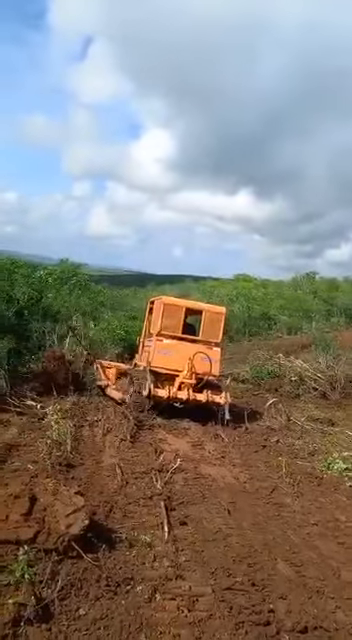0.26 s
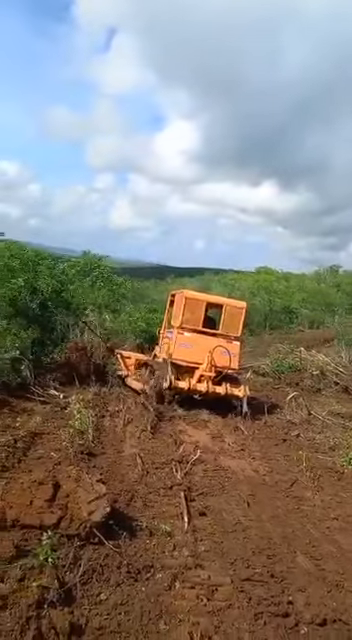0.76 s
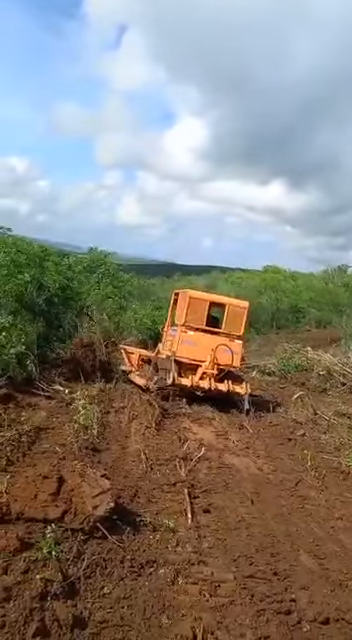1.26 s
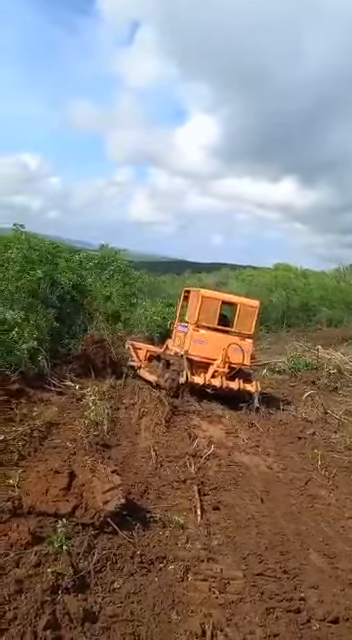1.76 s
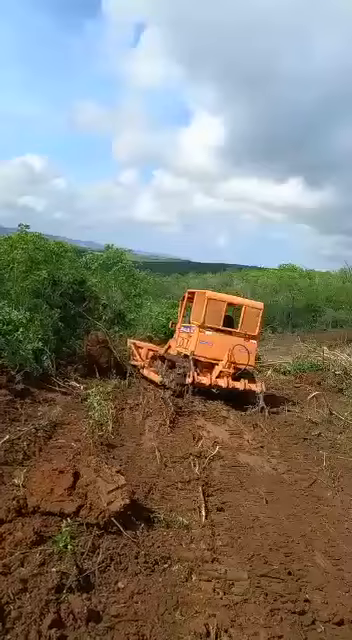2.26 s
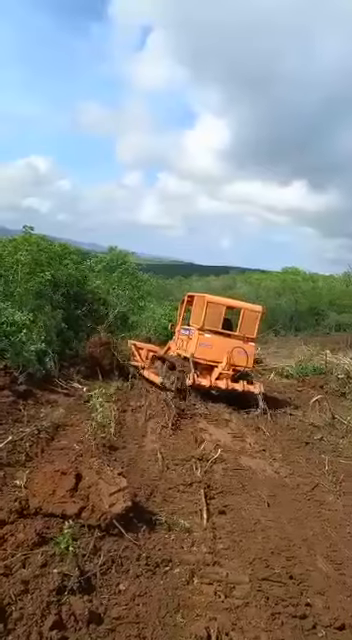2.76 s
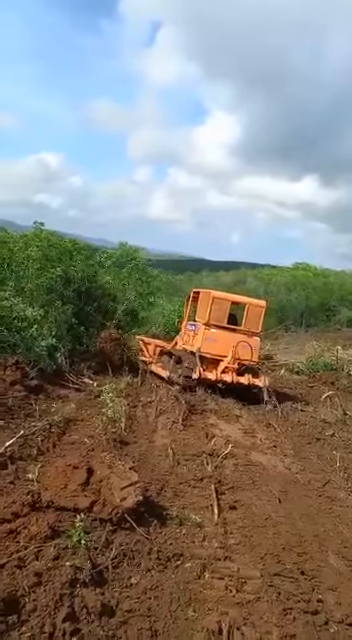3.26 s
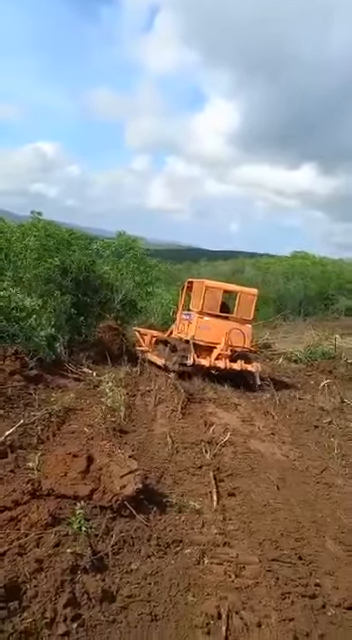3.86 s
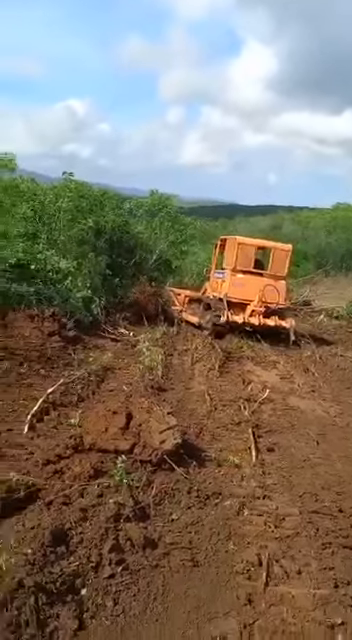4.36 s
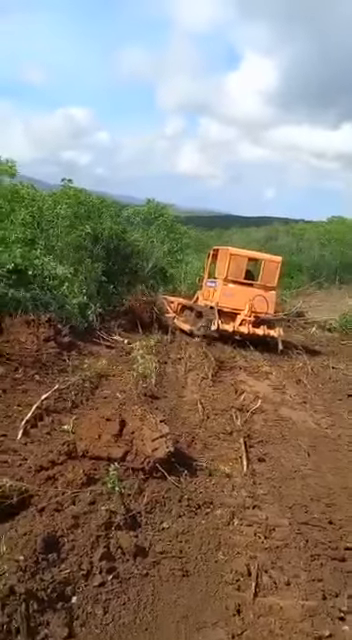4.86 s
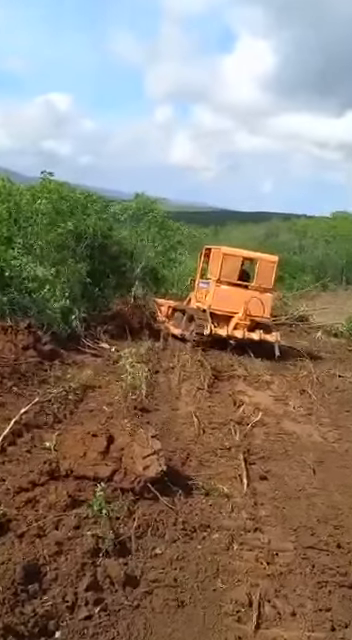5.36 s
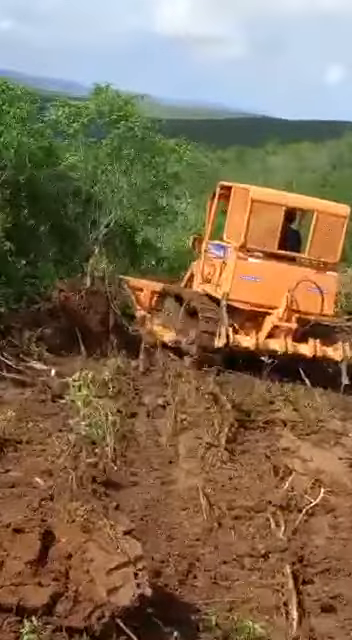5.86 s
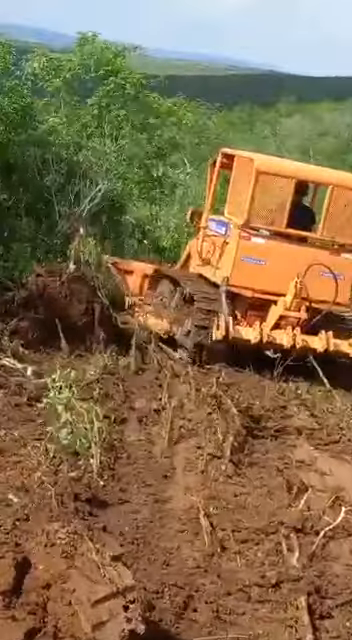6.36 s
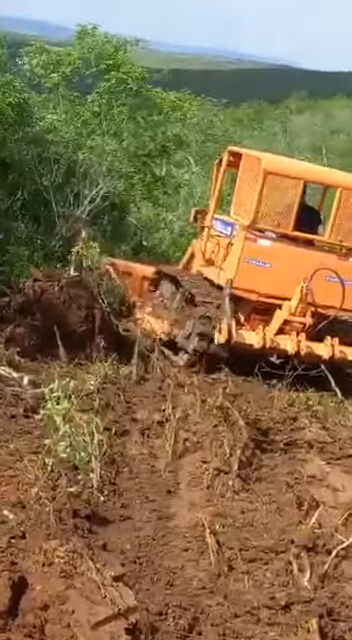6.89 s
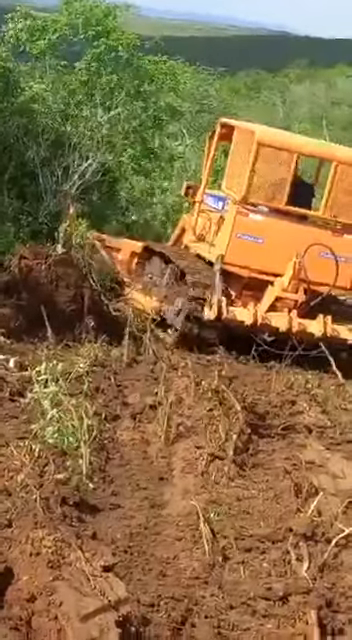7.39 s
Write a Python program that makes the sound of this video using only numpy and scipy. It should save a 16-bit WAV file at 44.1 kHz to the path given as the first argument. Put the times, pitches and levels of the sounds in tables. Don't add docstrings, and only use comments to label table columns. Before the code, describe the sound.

A steady heavy diesel drone fills an open field, broad low roar beneath and raspy metallic clatter above. It labours for about a second, its pitch sagging slightly, then runs freer and duller as the exhaust is shielded. Small steel clinks and roller knocks come irregularly, dry wood cracks now and then, the loudest past the middle together with a low wind thump. Outdoor stereo pickup at a distance, little echo.

```python
import sys
import numpy as np
from scipy import signal
from scipy.fft import rfft, irfft
from scipy.io import wavfile
from scipy.ndimage import uniform_filter1d

SR = 44100
rng = np.random.default_rng(int(sys.argv[2]) if len(sys.argv) > 2 else 0)


def field_ratio(decibels):
    return 10 ** (np.asarray(decibels, dtype=float) / 20)


def log_audio(samples):
    frames = np.atleast_2d(samples).T
    limited = np.clip(frames, -1, 1)
    pcm = np.round(limited * 32767).astype(np.int16)
    wavfile.write(sys.argv[1], SR, pcm)


N = 336483
T = np.arange(N) / SR
SLOW_STEP = 256
SLOW_T = np.arange(N // SLOW_STEP + 2) * SLOW_STEP / SR
CYLINDERS, FREE_HZ = 6, 82.3

# start_s, strain_0_to_1, turned_away_and_eased_0_to_1
WORK = [
    (0, 0, 0),
    (1.6, 0, 0),
    (1.78, 1, 0),
    (2.6, 1, 0),
    (2.9, .2, .3),
    (3.3, 0, .75),
    (4, 0, 1),
    (7.63, 0, 1),
]
# pitch_hz, facing_db_per_hz, turned_away_db_per_hz
METAL_COLOUR = [(1631, -68.5, -68), (1710, -75.5, -73), (2562, -68, -66.5), (2780, -63.5, -67.5),
                (3278, -80.5, -77), (3460, -73.5, -74), (4170, -76.5, -75), (4530, -73, -77),
                (6580, -81.5, -80), (6710, -76, -77.5), (7890, -78.5, -81), (8930, -76, -84),
                (10080, -77, -81), (11020, -69.5, -79.5), (12000, -71.5, -78.5)]
# pitch_hz, facing_rad, turned_away_rad
PORT_LEAD = [(493, 0, 0), (915, -.7, 0.19), (1126, -0.2, 0.58), (1408, -.8, 0.3), (1563, -.6, -1.5),
             (2000, -.4, 1), (2410, -1, -1.2), (2700, -0.12, -0.17), (3520, 0.3, 0.9), (4400, -.5, -1.5),
             (5200, 0.49, 1.5), (5900, -0.54, 1.3), (6800, -0.63, 2), (7400, 1.2, 2), (8370, 0.92, 3.5),
             (9900, -.3, 0.5), (11300, 0.17, 2)]
# hiss_in_view_db, hiss_hidden_db, knock_db
CYLINDER_DB = [(-0.5, -3, -4), (2, 0.5, 3), (-3, -2, 2), (-3, 1.5, -1), (0, 3, 0), (4.5, 0.5, 1.5)]


def evened(x):
    return x / np.sqrt(np.mean(x ** 2) + 1e-20)


def curve(rows, t):
    s, *columns = np.transpose(rows)
    return [np.interp(t, s, c) for c in columns]


def read(points, hz):
    f, *columns = np.transpose(points)
    return [np.interp(np.log(hz + 1), np.log(f + 1), c)[:, None] for c in columns]


def drift(count, hz):
    raw = rng.standard_normal((count, len(SLOW_T)))
    return evened(signal.sosfiltfilt(signal.butter(2, hz, fs=SR / SLOW_STEP, output="sos"), raw))


def sway(hz):
    return np.interp(T, SLOW_T, drift(count=1, hz=hz)[0])


def engine():
    # start_s, firing_rate_hz
    speed = [(0.0, 78.4), (0.25, 78.55), (0.6, 79.6), (0.8, 79.2), (1.32, 80.3), (1.62, 79.7), (2.0, 78.35),
             (2.45, 78.65), (2.88, 80.65), (3.3, 81.7), (3.8, 82.25), (4.55, 82.3), (5.4, 81.95),
             (6.03, 81.05), (6.7, 82.3), (7.05, 81.05), (7.35, 81.9), (7.63, 81.95)]
    # start_s, share_of_stack_hidden_by_cab_0_to_1
    stack_hidden = [
        (0, 0.08),
        (2.6, 0.4),
        (3.4, 0.74),
        (4.2, 1.05),
        (5.2, 0.82),
        (6.4, 0.92),
        (7.63, 0.97),
    ]
    firing_hz, = curve(speed, T)
    strain = curve(WORK, T)[0]
    hidden, = curve(stack_hidden, T)
    load = (FREE_HZ - firing_hz) / 3.8
    cycles = np.cumsum(firing_hz) / SR / CYLINDERS + .92
    pitched = boom(cycles, load) + orders(cycles) + fan(cycles)
    noisy = roar(load, strain) + clatter(cycles, strain, hidden) + hiss(cycles, hidden)
    return pitched + noisy + tappet(cycles, hidden)


def boom(cycles, load):
    db = -19.5 + 2 * load + 0.27 * sway(45)
    return np.sqrt(2) * field_ratio(db) * np.cos(2 * np.pi * CYLINDERS * cycles)


def orders(cycles):
    # multiple_of_cycle_rate, pushing_db, straining_db, eased_db
    exhaust = [(3, -52, -63, -68), (4, -42, -42, -43), (5, -48, -49, -53), (7, -40, -41, -45),
               (8, -42, -46, -39), (9, -34, -36, -32), (10, -42, -37, -47), (11, -46, -42, -39),
               (12, -38, -38, -34), (13, -42, -42, -48), (14, -45, -50, -48), (15, -42, -42, -45),
               (16, -40, -41, -49), (18, -46, -56, -45), (19, -52, -66, -64), (20, -44, -45, -42),
               (21, -60, -54, -54)]
    # multiple_of_cycle_rate, pushing_db, straining_db, eased_db
    machinery = [(22, -53, -49, -63), (30, -60, -53, -53), (31, -54, -51, -62), (34, -52, -52, -61),
                 (36, -53, -51, -68), (40, -50, -44, -54), (49, -52, -52, -47), (51, -51, -48, -49),
                 (52, -52, -49, -59), (54, -65, -56, -48), (56, -49, -55, -48), (57, -50, -50, -56),
                 (59, -55, -50, -53), (63, -55, -57, -53), (64, -56, -60, -47), (65, -61, -51, -53),
                 (66, -54, -50, -57), (68, -48, -52, -60), (69, -49, -54, -57), (70, -54, -43, -61),
                 (71, -51, -46, -60), (76, -56, -43, -54), (38, -50, -50, -52), (82, -60, -60, -57),
                 (47, -56, -56, -54), (53, -56, -55, -52), (55, -56, -56, -53), (60, -54, -50, -49),
                 (61, -57, -56, -52), (80, -60, -58, -57),
                 (100.3, -57, -55, -58), (120.3, -66, -66, -58), (72, -66, -58, -60), (67, -53, -56, -57),
             (39, -58, -64, -60)]
    low = tones(exhaust, cycles, trim_db=1.3, wander=.1, wander_hz=3.8, spread=0.0017)
    return low + tones(machinery, cycles, trim_db=2.8, wander=.16, wander_hz=2.0, spread=0.0025)


def tones(table, cycles, trim_db, wander, wander_hz, spread):
    uneven = [0, .47, .4, -.05, .05, .8]
    order_lead, aligned_top = .025, 21
    coarse = 8
    strain, eased = np.clip(curve(WORK, SLOW_T), 0, 1)
    t = T[::coarse]
    out = np.zeros((2, len(t)))
    for k, push_db, strain_db, eased_db in table:
        if k <= aligned_top:
            start = uneven[k % CYLINDERS] + order_lead * (k - CYLINDERS)
        else:
            start = rng.random()
        facing, away = np.ravel(read(PORT_LEAD, np.array([k * FREE_HZ / CYLINDERS])))
        lead = (facing + (away - facing) * eased) / 2
        db = trim_db + push_db + strain * (strain_db - push_db) + eased * (eased_db - push_db)
        re, im, side = drift(count=3, hz=wander_hz)
        loose = wander * (1 - 0.7 * strain)
        waver = (1 + loose * (re + 1j * im)) / np.sqrt(1 + 2 * loose ** 2)
        size = np.sqrt(2) * field_ratio(db) * waver
        spin = np.exp(2j * np.pi * (k * cycles[::coarse] + start))
        for port, sign in enumerate((1, -1)):
            turned = size * np.exp(1j * sign * (lead + spread * k * side))
            out[port] += (np.interp(t, SLOW_T, turned) * spin).real
    return signal.resample_poly(out, coarse, 1, axis=1)[:, :N]


def fan(cycles):
    # start_s, level_db
    fan_level = [(0.0, -34.5), (1.2, -46), (1.8, -38), (3.9, -37.5), (4.8, -34), (5.4, -34), (6.0, -29.5),
                 (7.2, -35.5), (7.63, -30)]
    size = np.sqrt(2) * field_ratio(curve(fan_level, T)[0] + 1.5 * sway(3.9))
    return size * np.cos(2 * np.pi * 16.95 * cycles + np.array([[.12], [-.12]]))


def roar(load, strain):
    # pitch_hz, facing_db_per_hz, turned_away_db_per_hz
    colour = [(25, -58, -63), (45, -57, -58), (60, -57, -56), (110, -55, -54), (200, -55, -55),
              (270, -57, -58), (330, -62, -62), (480, -64.5, -66.5), (600, -66, -67), (750, -63, -61),
              (900, -62, -64), (1050, -68, -68), (1300, -68, -71), (1700, -70, -70)]
    rumble = field_ratio(-32.5) * noise(colour, 12, 340, patch_db=0.88, size=2048)
    rush_db = -36 + 0.93 * load - 0.5 * strain
    return rumble + field_ratio(rush_db) * noise(colour, 300, 1250, patch_db=1.5, size=1024)


def clatter(cycles, strain, hidden):
    knock_db = np.transpose(CYLINDER_DB)[2]
    knock = evened(0.9 + puffs(cycles, .2, .6, lambda k: knock_db[k], scatter_db=4.0))
    db = -38.0 + 0.9 * strain - 0.94 * hidden
    return field_ratio(db) * knock * noise(METAL_COLOUR, 1360, 5300, patch_db=1.16, size=512)


def hiss(cycles, hidden):
    # low_hz, high_hz, steady_share, chance_db
    bands = [
        (3990, 7850, 1.0, 5.5),
        (8000, 9900, 0.28, 7),
        (9920, 13000, 0.3, 11.5),
    ]
    seen_db, hidden_db, _ = np.transpose(CYLINDER_DB)

    def pattern_db(k):
        return seen_db[k] + (hidden_db - seen_db)[k] * hidden

    flutter = field_ratio(1.1 * sway(42))
    air = noise(METAL_COLOUR, 5800, 12670, patch_db=1.9, size=256)
    puffed = 0
    for low_hz, high_hz, steady, chance_db in bands:
        gate = steady + 0.62 * hidden + puffs(cycles, 0.11, 0.34, pattern_db, chance_db)
        band = signal.butter(3, [low_hz, high_hz], "band", fs=SR, output="sos")
        puffed = puffed + evened(gate * flutter) * signal.sosfiltfilt(band, air)
    return field_ratio(-35 - 12.5 * hidden) * puffed


def puffs(cycles, rise, fall, pattern_db, scatter_db):
    firing = cycles * CYLINDERS + 0.6
    index, since = firing.astype(int), firing % 1
    chance = np.tanh(rng.standard_normal(1000) / 1.5)[index]
    db = pattern_db(index % CYLINDERS) + scatter_db * chance
    opening = 1 - np.exp(-(since / rise) ** 2)
    return field_ratio(db) * opening * np.exp(-since / fall) * np.minimum(10 * (1 - since), 1)


def tappet(cycles, hidden):
    pitch_hz, width_hz, t60_s = 7160, 200, 0.061
    turn = cycles - 0.3 + 1
    since_s = (turn % 1) * CYLINDERS / FREE_HZ
    chance = rng.standard_normal(200).clip(-2, 2)[turn.astype(int)]
    db = -55 - 11 * hidden + 4.0 * chance - 60 * since_s / t60_s
    edges_hz = [pitch_hz - width_hz / 2, pitch_hz + width_hz / 2]
    band = signal.butter(2, edges_hz, "band", fs=SR, output="sos")
    ring = evened(signal.sosfilt(band, rng.standard_normal((2, N))))
    return 4 * ring * field_ratio(db + np.array([[-4.], [4.]])) * np.minimum(since_s / .001, 1)


def noise(points, lo_hz, hi_hz, patch_db, size):
    # pitch_hz, facing_db, turned_away_db
    shadow = [(860, -2.5, -3), (1138, -0.5, -1.5), (1297, -1, 1.5), (1737, -1.5, -3), (2106, -2, -3.5),
              (2365, -7.5, -7), (2800, -6, -8.5), (3045, -4, -3.5), (3510, 0.5, -0.5), (4040, -4, -5.5),
              (4900, -10.5, -8), (6020, -5, -1.5), (7030, -7, -10.5), (8100, -6, -2.5), (9000, -7, -3),
              (9400, -9.5, -13), (10000, -8, -13.5), (10700, -15, -12), (11600, -17, -16)]
    # pitch_hz, facing_0_to_1, turned_away_0_to_1
    likeness = [(60, 0.95, 0.97), (202, 0.97, .99), (330, 0.96, 0.97), (500, 0.95, 0.93), (651, .975, .98),
                (920, .85, .92), (1143, .93, .9), (1533, .6, .65), (1830, 0.25, 0.82), (2046, .68, .94),
                (2460, 0.41, .72), (2670, 0.66, 0.8), (3160, .6, .45), (3540, 0.85, .93), (4300, .3, 0.41),
                (4700, 0.43, .3), (5900, .32, .42), (6500, 0.17, .22), (7200, .3, .15), (7680, 0.38, 0.3),
                (8740, .38, .48), (9200, 0.21, .08), (11100, 0.52, 0.28)]
    hop = size // 4
    frames, hz = N // hop + 5, np.fft.rfftfreq(size, 1 / SR)
    frame_s = np.arange(frames) * hop / SR
    turned = np.clip(curve(WORK, frame_s)[1], 0, 1)

    def by_heading(table):
        facing, away = read(table, hz)
        return facing + (away - facing) * turned

    a, b, c, d, patches = rng.standard_normal((frames, len(hz), 5)).T
    patches = uniform_filter1d(patches, size // 100, 0)
    patches = evened(uniform_filter1d(patches, 3000 // hop, 1))
    edges = 1 / np.sqrt((1 + (lo_hz / (hz + 1)) ** 8) * (1 + (hz / hi_hz) ** 8))[:, None]
    right = (a + 1j * b) * edges
    same = np.clip(by_heading(likeness), 0, 1)
    shared = same * right * np.exp(1j * by_heading(PORT_LEAD))
    left = shared + np.sqrt(1 - same ** 2) * (c + 1j * d) * edges
    z = np.array([left * field_ratio(by_heading([(612, 0, 0)] + shadow)), right])
    z *= field_ratio(by_heading(points) + patch_db * patches + panels(hz, frame_s))
    x = signal.istft(z, nperseg=size, noverlap=size - hop)[1][:, :N]
    return x / np.sqrt(uniform_filter1d(x.mean(0) ** 2, SR) + 1e-20)


def panels(hz, s):
    # pitch_hz, width_hz, tail_on_db, half_turned_db, flank_on_db
    bands = [(337.4, 40, -2, -1.5, -2), (482, 25, -0.5, -2.5, -5.5), (1118, 70, -1.5, 0, -1.5),
             (1640, 33, 3, 4, 2.5), (1803, 90, -4, -1.5, -1.5), (2480, 110, 0.5, 4, 3.5),
             (3210, 100, -0.5, -0.5, -3), (3736, 120, -2.5, 1, 8), (3996, 81, 4.5, -12, -6),
             (4300, 120, -4, 2, 5), (5250, 66, -3, 2.5, -3), (6020, 150, 0.5, -6, -6),
             (7980, 330, -2.5, -5, -7.5), (8460, 140, -9.5, 0, -7)]
    # start_s, heading (0 tail on, 1 half turned, 2 flank on)
    swing = [
        (0, 0),
        (2.6, 0),
        (3.8, 1),
        (5.2, 1),
        (5.8, 2),
        (7.63, 2),
    ]
    heading, = curve(swing, s)
    db = 0
    for pitch_hz, width_hz, *levels_db in bands:
        shape = np.exp(-((hz[:, None] - pitch_hz) / width_hz) ** 2)
        db = db + shape * np.interp(heading, range(3), levels_db)
    return db


def placed(s, pan_db, sound):
    out, at = np.zeros((2, N)), round(s * SR)
    part = out[:, at:at + sound.shape[-1]]
    part += (sound * field_ratio([[pan_db / 2], [-pan_db / 2]]))[..., :part.shape[1]]
    return out


def tracks():
    # start_s, peak_db, left_minus_right_db, pitch_hz
    clinks = [(0.112, -28.5, -6, 2480), (0.34, -31.5, -10, 2820), (0.708, -28.5, -6, 2800),
              (0.845, -25, -4.5, 2595), (1.1488, -22.5, -4, 2780), (1.3389, -41, -6, 2550),
              (1.696, -27, 0, 2520), (1.896, -27, 3, 2780), (1.926, -27, -9, 2660), (2.813, -29, -7, 2610),
              (3.2585, -44, -2, 2620), (3.475, -29.5, -3, 2760), (4.078, -32, -4, 1640),
              (5.376, -35, -11, 2350), (5.394, -27.5, -5, 2370), (5.449, -27, -10, 2690),
              (5.4223, -34, -28, 2480), (5.8154, -29, -13.5, 2690), (6.032, -36, -13, 2360),
              (6.693, -39, -16, 2430), (7.133, -30, -4, 2480)]
    # start_s, peak_db, left_minus_right_db, pitch_hz
    higher_clinks = [(0.773, -34, -5.0, 4600), (0.9202, -33, -2.5, 3370), (1.5223, -30.5, -5.5, 4050),
                     (1.6007, -32, -3.0, 3440), (1.8735, -32, -1.5, 3990), (2.785, -34, -3.5, 3670),
                     (3.1701, -35, -2.0, 3520), (3.5517, -34, -2.0, 3640), (4.805, -33, -2.0, 3700),
                     (5.4235, -26, -2.5, 3680), (5.5267, -32, -1.5, 3700), (5.9782, -31.5, -1.5, 3730),
                     (6.2621, -34, -2.5, 3690), (7.1416, -31, -5, 3700), (7.2613, -32, -2.5, 3700)]
    t = np.arange(1500) / SR
    shape = (1 - np.exp(-t / 0.00074)) * field_ratio(-60 * t / 0.039)
    out = 0
    for s, db, pan_db, hz in clinks + higher_clinks:
        modes = np.sin(2 * np.pi * hz * t) + 0.2 * np.sin(2 * np.pi * 1.7 * hz * t)
        out = out + placed(s, pan_db, field_ratio(db - 1.0) * shape * modes)
    return out


def brush():
    # start_s, peak_db, left_minus_right_db, t60_s
    snaps = [
        (0.4803, -21, -12, 0.026),
        (1.524, -27, 1, 0.06),
        (1.873, -33, -6, 0.04),
        (4.4336, -26.5, -8, 0.051),
        (4.6077, -30, 1, 0.061),
        (4.655, -32, -10, 0.04),
        (5.422, -17.5, -8, 0.068),
        (6.2621, -46, -6, 0.043),
        (6.4083, -30, 3, 0.04),
        (7.2603, -41, 6, 0.04),
    ]
    t = np.arange(4000) / SR
    bright = signal.butter(2, [2600, 7500], "band", fs=SR, output="sos")
    out = 0
    for s, db, pan_db, t60_s in snaps:
        burst = evened(signal.sosfilt(bright, rng.standard_normal((2, len(t)))))
        out = out + placed(s, pan_db, field_ratio(db - 11.0 - 60 * t / t60_s) * burst)
    return out


def wind():
    # start_s, level_db, length_s
    gusts = [(0.33, -43, 0.03), (0.473, -39, 0.037), (0.593, -55, 0.019), (0.717, -40.5, 0.041),
             (0.93, -42, 0.027), (2.088, -39, 0.033), (2.594, -35.5, 0.044), (3.394, -40, 0.036),
             (3.85, -43, 0.051), (4.34, -42, 0.084), (4.601, -39.5, 0.12), (4.949, -40, 0.2),
             (5.32, -23, 0.039), (5.419, -33, 0.084), (5.78, -40.5, 0.15), (6.186, -43, 0.11),
             (6.651, -38, 0.066), (6.902, -39, 0.072), (7.197, -41, 0.12)]
    # pitch_hz, level_db_per_hz
    wind_colour = [(15, -39), (40, -7), (90, -6.5), (200, -14), (300, -17), (500, -32), (1000, -55)]
    colour = field_ratio(read(wind_colour, np.fft.rfftfreq(N, 1 / SR))[0][:, 0])
    air = evened(irfft(rfft(rng.standard_normal((2, N))) * colour, N))
    strength = field_ratio(-71)
    for s, db, length_s in gusts:
        strength = strength + field_ratio(db) * np.exp(-((T - s) / length_s) ** 2)
    return air * strength


def scene():
    return engine() + tracks() + brush() + wind()


def roll_off(x):
    return signal.sosfilt(signal.butter(12, 12400, fs=SR, output="sos"), x)


def record(dry):
    body = signal.sosfilt(signal.butter(2, 35, "high", fs=SR, output="sos"), dry)
    top_cut = signal.firwin(201, 11780, window=("kaiser", 7), fs=SR)
    body = signal.oaconvolve(body, top_cut[None], "same")
    return roll_off(body)


dry = scene()
out = record(dry)
log_audio(out)
```